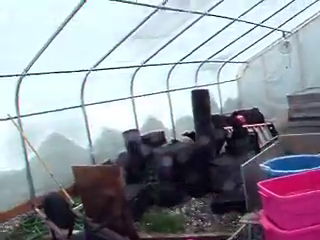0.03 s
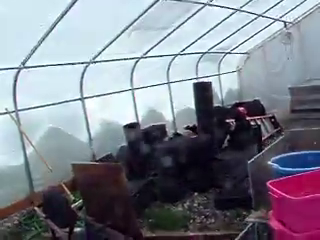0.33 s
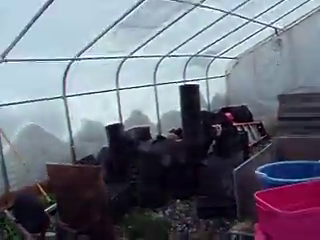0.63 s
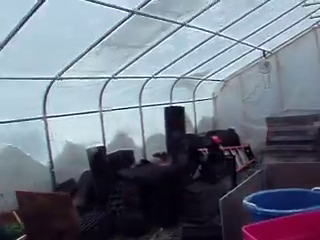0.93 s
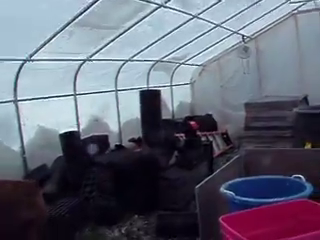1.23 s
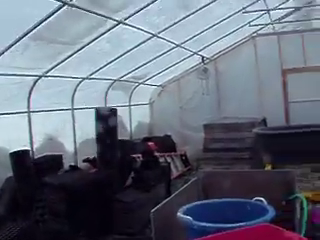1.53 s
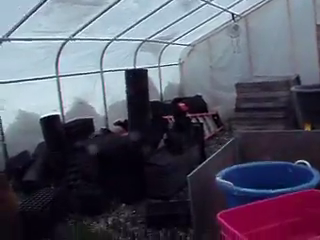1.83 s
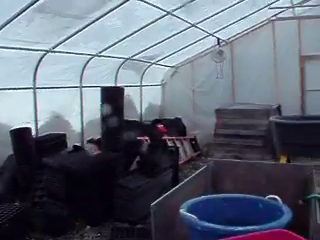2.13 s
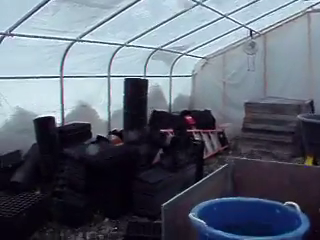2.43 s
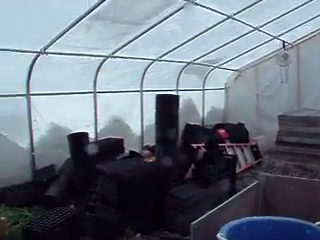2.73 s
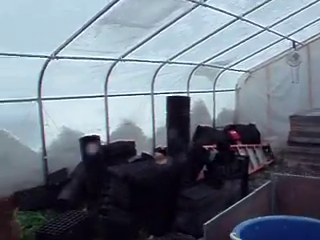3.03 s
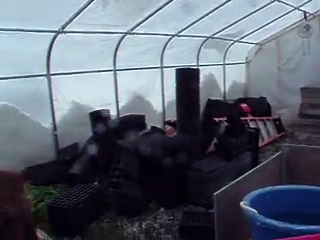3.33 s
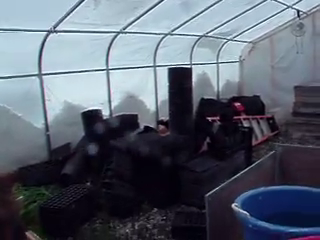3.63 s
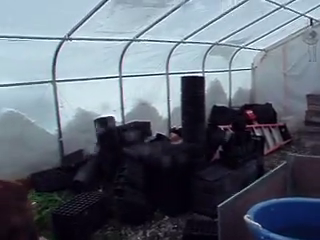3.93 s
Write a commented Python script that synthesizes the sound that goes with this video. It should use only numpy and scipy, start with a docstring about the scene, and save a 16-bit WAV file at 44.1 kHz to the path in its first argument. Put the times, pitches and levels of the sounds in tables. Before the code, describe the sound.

Hard plastic clicks and knocks unevenly among hollow thuds and gravel scuffs, over a soft hiss.

```python
"""Hard plastic things click and snap as someone shifts about in a plastic-film greenhouse.
Each hit sets a plastic shell ringing briefly. Softer, heavier bumps thud on hollow things,
and shoes scuff on gravel, making many tiny stones click. The tunnel-shaped greenhouse adds
a short bright echo and a longer low one. Under it all lie a steady hiss, a thin electric
whine and two faint drips."""
import sys
import numpy as np
from scipy import signal
from scipy.fft import rfft, irfft, next_fast_len
from scipy.io import wavfile
from scipy.ndimage import uniform_filter1d

SR = 44100
rng = np.random.default_rng(int(sys.argv[2]) if len(sys.argv) > 2 else 0)


def inscribe(sig):
    """Save sig as 16-bit PCM at rate SR to the path in sys.argv[1].

    A 1-D sig is mono; a 2-D sig holds one channel per row.
    Samples are clipped to [-1, 1] before scaling.
    """
    pcm = np.round(np.clip(np.atleast_2d(sig).T, -1, 1) * 32767)
    wavfile.write(sys.argv[1], SR, pcm.astype(np.int16))


N = 176400  # 4 seconds

# Tone of the hiss: pitch_hz, level_db
HISS_TONE = [(30, -47), (80, -44.5), (160, -44.5), (300, -45), (600, -46), (1100, -44.5), (1500, -45),
             (1830, -42), (2100, -46), (2700, -46), (4500, -47.5), (5500, -46.5), (7200, -44.5),
             (8000, -41)]
# Thin tones of the whine: pitch_hz, level_db
WHINE_TONES = [(1411, -62.5), (1832, -58.5), (2256, -66.5), (5179, -69), (6589, -64), (7009, -64.5),
               (7159, -65.5)]
# Where a click's bass, body, mid, high and top lie: pitch_hz
CLICK_BANDS_HZ = [60, 400, 1400, 3200, 6200]
# Plastic clicks: start_s, body_db, mid_db, high_db, top_db, ring_s, echo_db
# (ring_s is always the time a sound takes to fade by 60 dB)
CLICKS = [ (.052, -33, -35, -38, -41, .07, -13), (.133, -45, -50, -57, -44, 0.018, -10),
          (.180, -40, -35, -57, -37.5, 0.027, -16), (.204, -43, -60, -49, -43, .02, -8),
          (.295, -47, -47, -54, -50, .025, -6), (.345, -47, -43, -45, -45.5, .07, -6),
          (.777, -46, -52, -48, -43, .04, -8), (0.8414, -49, -50, -47.5, -41.5, .02, -4),
          (1.462, -43.5, -37.5, -42, -41, .05, -0.5), (1.468, -36.5, -37.5, -34.5, -34.5, .04, -0.5),
          (1.531, -55, -52, -39, -49, .04, 2), (1.9335, -28, -25.5, -30.5, -33.5, 0.074, -4.5),
          (2.318, -48, -43, -50, -55, .03, -7), (2.402, -46, -43, -48.5, -56, 0.036, -6),
          (2.523, -52, -49, -46, -51, .02, -6.5), (2.671, -39, -31.5, -29, -29, 0.054, -1),
          (2.682, -43.5, -40, -31.5, -32.5, 0.067, -4), (2.853, -44.5, -43, -51, -59, .04, -7),
          (3.008, -44, -37, -39.5, -51, 0.12, -3.5), (3.0862, -32.5, -29, -15.5, -14.5, 0.053, -7),
          (3.5078, -34, -28.5, -26, -31.5, .06, -1.5), (3.853, -30, -32.5, -29, -36, 0.06, -3), ]
# Notes that ring in the two hardest-hit plastic pieces: pitch_hz, level_db, ring_s
SNAP_NOTES = [(430, -43.5, 0.29), (517, -39.5, 0.32), (590, -41, 0.29), (673, -44, .2), (1330, -37.5, 0.12),
              (1806, -40.5, .12), (3100, -37, 0.17), (3618, -33, .09), (5450, -30.5, .1), (5870, -37, .12),
              (6226, -28.5, 0.15), (6320, -23.5, 0.011)]
CLACK_NOTES = [(2126, -37, 0.082), (3420, -37.5, 0.059), (4330, -53, .05)]
# Dull bumps: start_s, bass_db, low_db, body_hz, body_db, mid_db, ring_s, echo_db
BUMPS = [ (.056, -37, -32.5, 500, -39, -50, 0.11, 6), (.1755, -23, -13.5, 675, -18, -31, 0.082, -9),
         (.205, -25, -19, 480, -28, -54, .09, -1), (.748, -45, -42, 520, -36, -55, .05, -14),
         (1.863, -54, -33, 370, -24.5, -58, 0.056, -4), (1.903, -48, -32, 380, -25, -56, 0.073, -3.5),
         (2.089, -49, -39.5, 450, -32, -41.5, 0.15, 0), (2.655, -32, -28.5, 300, -42, -46, 0.1, -1.5),
         (3.515, -31, -32, 600, -38, -58, 0.16, 10), (3.561, -31.5, -19.5, 570, -14, -37, 0.18, -3.5),
         (3.68, -32, -32.5, 261, -27.5, -57, 0.26, 7), (3.815, -31, -35, 500, -32, -44, 0.11, -2.5),
         (3.903, -37, -32.5, 1010, -27, -33.5, 0.12, -4), (3.928, -25, -24, 380, -28, -58, .12, 1), ]
# Where a scuff's bass, body, mid, high and top lie: pitch_hz
SCUFF_BANDS_HZ = [80, 450, 1500, 3200, 6200]
# Shoes on gravel: peak_s, rise_s, fall_s, body_db, mid_db, high_db, top_db
SCUFFS = [ (.10, 0.018, .05, -38, -38, -50, -46), (.44, 0.037, 0.13, -35, -45, -49, -54),
          (.75, .03, 0.052, -36.5, -41.5, -40, -52), (1.70, 0.018, 0.039, -47, -43, -34.5, -45),
          (1.865, 0.053, 0.12, -30.5, -52, -58, -59), (2.135, 0.04, 0.052, -33.5, -35.5, -36.5, -35.5),
          (2.29, 0.056, 0.093, -35.5, -35.5, -43.5, -45), (2.43, 0.059, 0.22, -37.5, -38.5, -39.5, -44.5),
          (2.859, 0.098, 0.21, -32, -40.5, -43, -45), (3.088, 0.0089, 0.018, -21.5, -18.5, -28, -32.5),
          (3.912, .01, 0.043, -37.5, -44, -42, -31.5), ]
# Falling drops: start_s, pitch_hz, level_db, ring_s
DRIPS = [(.856, 878, -49.5, .06), (1.553, 2530, -45.5, .012)]
# How long the greenhouse echoes: pitch_hz, ring_s
ECHO_TIMES = [(100, 1.0), (250, 0.73), (600, 0.44), (1500, 0.37), (4000, 0.39), (8000, 0.37)]
# How the microphone dulls the treble: pitch_hz, level_db
MIC_TONE = [(6000, 0), (7200, -2.5), (7800, -10.5), (8400, -20.5), (9000, -36)]


def gain(db):
    """Turn decibels into a number to multiply by."""
    return 10 ** (np.asarray(db) / 20)


def unit_energy(x):
    """Scale a sound so that its energy is 1."""
    return x / np.sqrt(np.sum(x ** 2) + 1e-18)


def read_curve(hz, points):
    """Read between (pitch_hz, value) points, with octaves evenly spaced."""
    pitches, values = np.array(sorted(points), float).T
    return np.interp(np.log(np.maximum(hz, 1)), np.log(pitches), values)


def shape_tone(x, points):
    """Make lows and highs louder or softer, following (pitch_hz, level_db) points."""
    size = next_fast_len(len(x) // 2 + 4096) * 2
    curve_db = read_curve(np.fft.rfftfreq(size, 1 / SR), points)
    cepstrum = irfft(np.log(gain(curve_db)))
    # Fold the filter forward in time, so nothing sounds before its hit.
    cepstrum[1:size // 2] *= 2
    cepstrum[size // 2 + 1:] = 0
    return irfft(rfft(x, size) * np.exp(rfft(cepstrum)))[:len(x)]


def fade(ring_s):
    """A one-second curve that falls 60 dB every ring_s."""
    return np.exp(-np.log(1000) * np.arange(SR) / SR / np.maximum(ring_s, 1e-3))


def wander(turns_per_s):
    """A random drift, mostly between -1 and 1."""
    step = int(SR / turns_per_s)
    return uniform_filter1d(np.repeat(rng.standard_normal(N // step + 1), step), step)[:N]


def add_hit(out, start_s, hit):
    """Mix in a hit, scaled so that an energy of 1 averages 0 dB over 40 ms."""
    start = int(start_s * SR)
    out[start:start + len(hit)] += hit[:N - start] * np.sqrt(.04 * SR)


def hiss_and_whine(waver_hz=1.11, flicker_db=1.2):
    """An even hiss, and an electric whine whose tones waver a little in pitch and level."""
    out = shape_tone(rng.standard_normal(N), HISS_TONE)
    for hz, db in WHINE_TONES:
        phase = 2 * np.pi * np.cumsum(hz + waver_hz * wander(12)) / SR
        out += np.sqrt(2) * gain(db + flicker_db * wander(8)) * np.sin(phase)
    return out


def shell_hit(ring_s, crack, spread_s=0.00049):
    """A crack at first contact, then shaking that spreads through a shell and dies away."""
    spread = 1 - np.exp(-np.arange(SR) / SR / spread_s)
    hit = unit_energy(rng.standard_normal(SR) * spread * fade(ring_s))
    hit[0] += crack
    return unit_energy(hit)


def greenhouse_echo(x, echo_db, build_s=0.0072):
    """A sound plus its blurred echo in the tunnel, where the bass lasts longest."""
    spectrum, hz = rfft(rng.standard_normal(SR)), np.fft.rfftfreq(SR, 1 / SR)
    octaves_hz = 100 * 2. ** np.arange(8)
    build_up = 1 - np.exp(-np.arange(SR) / SR / build_s)
    tail = 0
    for centre_hz, this_octave in zip(octaves_hz, np.eye(len(octaves_hz))):
        band = irfft(spectrum * read_curve(hz, zip(octaves_hz, this_octave)), SR)
        ring_s = read_curve(centre_hz, ECHO_TIMES)
        tail += band * unit_energy(build_up * fade(ring_s))
    return x + gain(echo_db) * signal.fftconvolve(x, tail)[:len(x)]


def plastic_clicks(bass_vs_body_db=-6.5, snap_s=3.0862, clack_s=3.5085):
    """Hard plastic clicks when struck; the two hardest-hit pieces also ring with clear notes."""
    out = np.zeros(N)
    for start_s, body, mid, high, top, ring_s, echo_db in CLICKS:
        tone = zip(CLICK_BANDS_HZ, [body + bass_vs_body_db, body, mid, high, top])
        click = shape_tone(shell_hit(ring_s, crack=.15), tone)
        add_hit(out, start_s, greenhouse_echo(click, echo_db))
    for start_s, notes in [(snap_s, SNAP_NOTES), (clack_s, CLACK_NOTES)]:
        add_hit(out, start_s, sum(ringing_note(*note) for note in notes))
    return out


def dull_bumps():
    """Soft, heavy hits shake something hollow and boom in the tunnel."""
    out = np.zeros(N)
    for start_s, bass, low, body_hz, body, mid, ring_s, echo_db in BUMPS:
        tone = [(30, bass - 11), (92, bass), (203, low),  # pitch_hz, level_db
                (body_hz, body), (1800, mid), (5970, mid - 14)]
        crack = min(1, .06 / ring_s) ** 2  # short bumps have the hardest first contact
        bump = shape_tone(shell_hit(ring_s, crack), tone)
        add_hit(out, start_s, greenhouse_echo(bump, echo_db))
    return out


def gravel_scuffs(stones_per_s=1800, spread_db=4, bunches_per_s=70, bunch_db=1.85,
                  bass_vs_body_db=-15.5):
    """Tiny stones click under a shoe, blending into a crunch that swells and fades."""
    t, out = np.arange(N) / SR, np.zeros(N)
    for peak_s, rise_s, fall_s, body, mid, high, top in SCUFFS:
        strengths = gain(spread_db * np.minimum(rng.exponential(size=N), 4))
        struck = rng.random(N) < stones_per_s / SR
        stones = struck * strengths * np.sign(rng.standard_normal(N))
        swell = np.exp(-np.maximum((peak_s - t) / rise_s, (t - peak_s) / fall_s))
        bunches = gain(bunch_db * wander(bunches_per_s))  # stones give way in small bunches
        tone = zip(SCUFF_BANDS_HZ, [body + bass_vs_body_db, body, mid, high, top])
        out += shape_tone(stones / stones.std() * swell * bunches, tone)
    return greenhouse_echo(out, echo_db=-3.5)


def ringing_note(hz, db, ring_s):
    """One pure note that dies away."""
    wave = np.sin(2 * np.pi * hz * np.arange(SR) / SR)
    return gain(db) * unit_energy(wave * fade(ring_s))


def drips():
    """Each drop lands with a short plink."""
    out = np.zeros(N)
    for start_s, hz, db, ring_s in DRIPS:
        add_hit(out, start_s, ringing_note(hz, db, ring_s))
    return greenhouse_echo(out, echo_db=-10)


def cut_treble(x, above_hz):
    """Steeply remove the sound above a pitch."""
    return signal.sosfilt(signal.ellip(10, .2, 80, above_hz, fs=SR, output="sos"), x)


def scene():
    """Add all the sounds into one channel."""
    return (plastic_clicks() + dull_bumps() + gravel_scuffs() + drips() + hiss_and_whine())[None]


def record(dry):
    """A small microphone loses the highest treble; peaks too loud for the recorder are cut flat."""
    peak_limit = 0.73
    dulled = cut_treble(shape_tone(dry[0], MIC_TONE), above_hz=8900)
    clipped = np.clip(dulled, -peak_limit, peak_limit)
    return cut_treble(clipped, above_hz=16000)[None]


dry = scene()
out = record(dry)
inscribe(out)
```